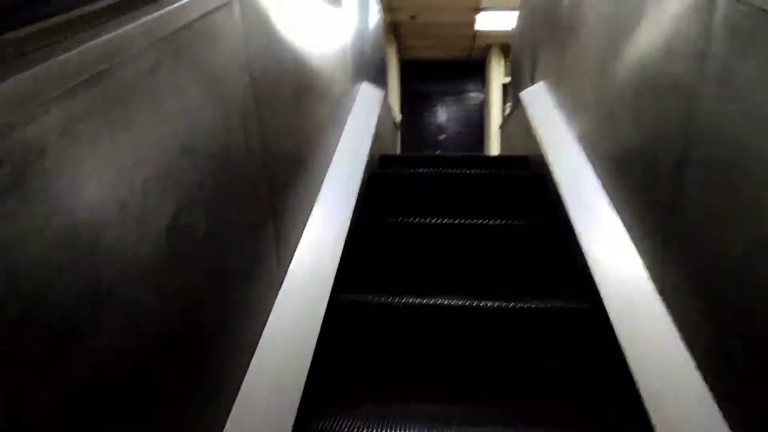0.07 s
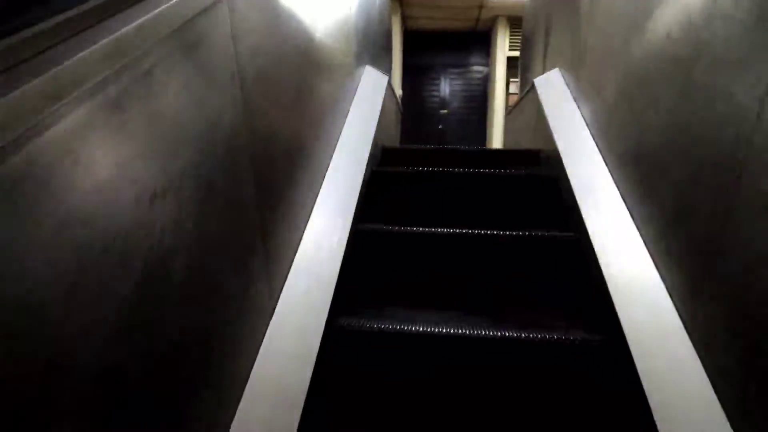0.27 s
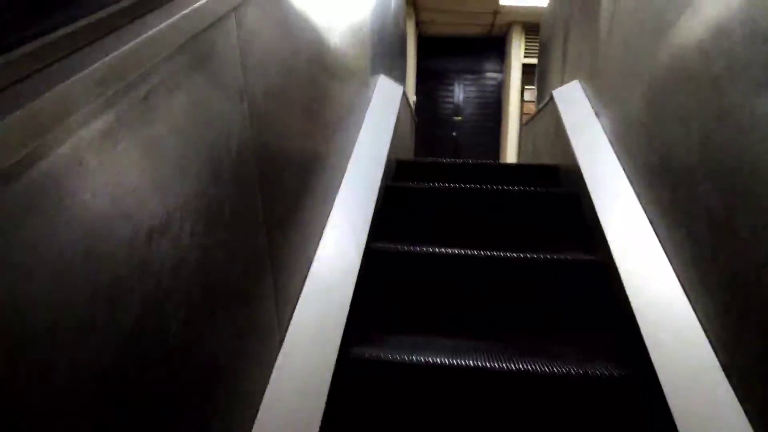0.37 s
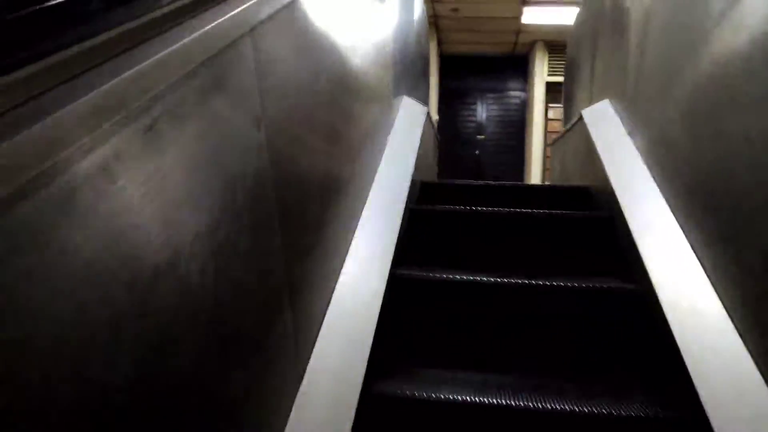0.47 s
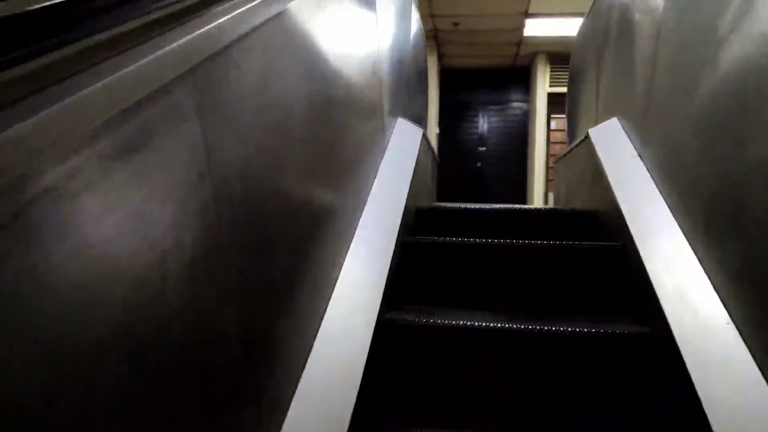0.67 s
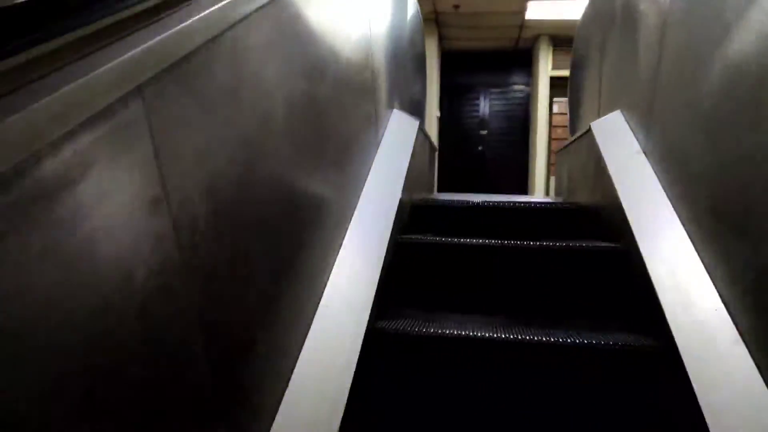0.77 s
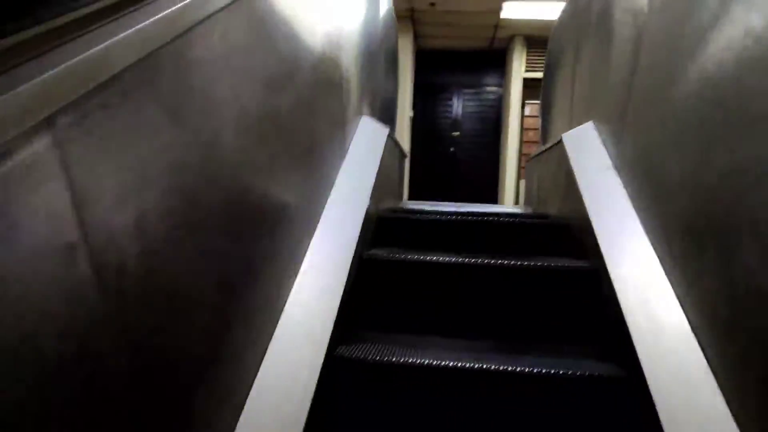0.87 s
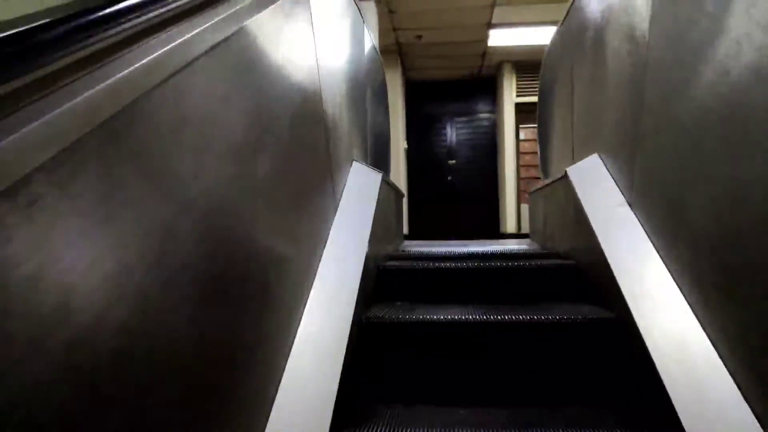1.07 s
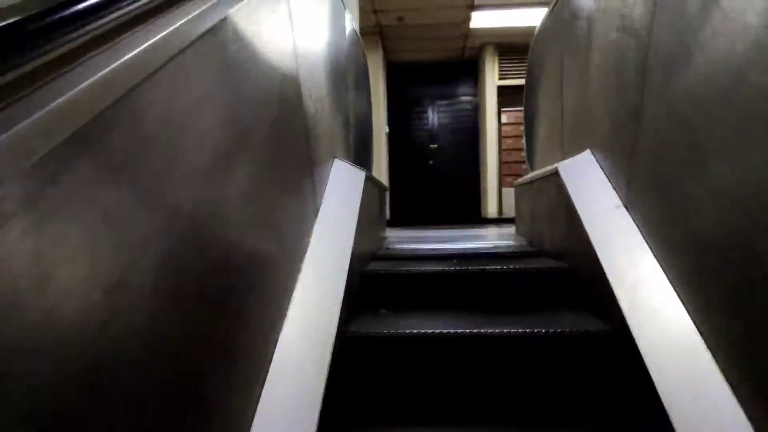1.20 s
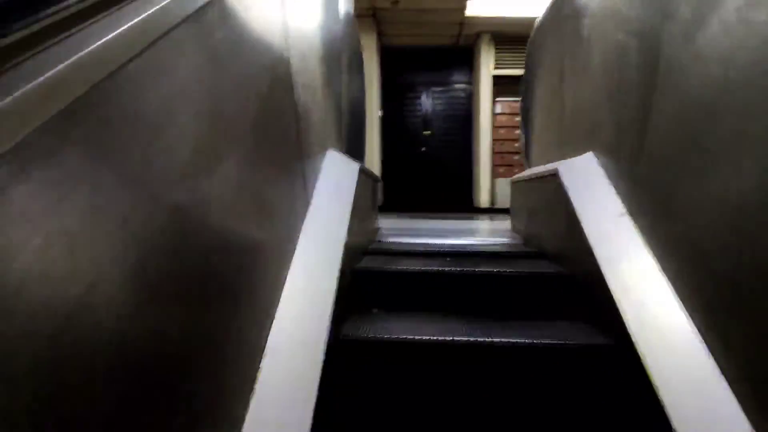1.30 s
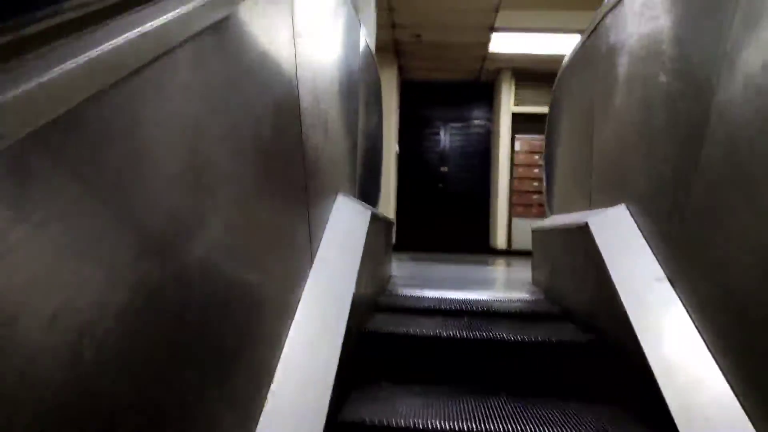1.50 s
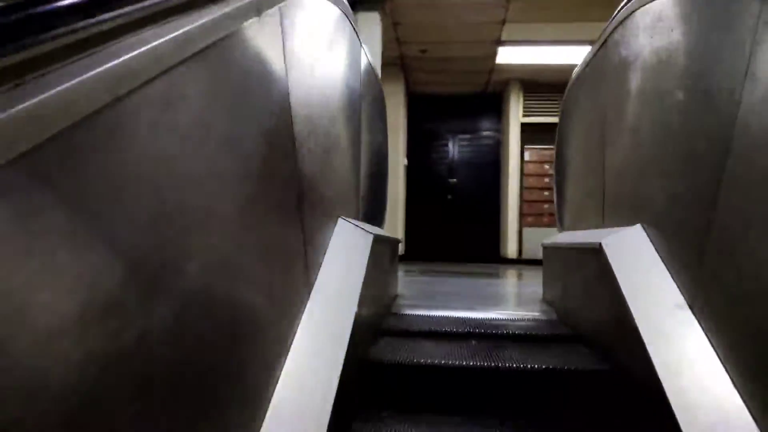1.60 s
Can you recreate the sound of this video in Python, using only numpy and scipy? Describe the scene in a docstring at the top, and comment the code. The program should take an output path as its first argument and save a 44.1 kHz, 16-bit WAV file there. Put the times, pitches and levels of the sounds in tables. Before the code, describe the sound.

Three heavy footsteps thud up metal escalator steps over a low building rumble.

```python
"""Three heavy steps up the metal stairs of an escalator, between steel side panels.
The hall rumbles and hisses throughout, with a faint machinery drone; clothes rustle from the start.
At 0.24 s a shoe clacks on the ribbed tread, thuds with the body's weight and scuffs; the stair rings.
The step at 0.74 s scuffs on along the ribs and the loaded stair groans; a brush and a squeak follow.
The last step lands at 1.24 s and its echoes fade into the hall."""
import sys
import numpy as np
from scipy import signal
from scipy.fft import rfft, irfft
from scipy.io import wavfile
from scipy.ndimage import uniform_filter1d

SR = 44100
rng = np.random.default_rng(int(sys.argv[2]) if len(sys.argv) > 2 else 0)


def unload_wav(signal):
    """Save mono or channel-first audio to the path in sys.argv[1] as 16-bit WAV at rate SR, clipped to [-1, 1]."""
    wavfile.write(
        sys.argv[1],
        SR,
        np.round(np.clip(np.atleast_2d(signal).T, -1, 1) * 32767).astype(np.int16),
    )


N = 72765
TIME_S = np.arange(N) / SR
BIN_HZ = np.fft.rfftfreq(N, 1 / SR)


def from_db(db):
    """Decibels to gain."""
    return 10 ** (np.asarray(db) / 20)


def pan(db):
    """Stereo gains for a left-minus-right level."""
    return from_db([[db / 2], [-db / 2]])


def at_hz(points, hz, column=1):
    """Table column, interpolated over log frequency."""
    table = np.array(points)
    return np.interp(np.log(np.maximum(hz, 1)), np.log(table[:, 0]), table[:, column])


def wander(per_s):
    """Random drift, spread about 1."""
    return np.interp(TIME_S * per_s, np.arange(N), rng.standard_normal(N))


def burst(start_s, rise_s, t60_s):
    """Linear rise, exponential release."""
    age_s = TIME_S - start_s
    return np.clip(age_s / rise_s, 0, 1) * from_db(-60 * np.maximum(age_s - rise_s, 0) / t60_s)


def swell(centre_s, half_width_s):
    """Gaussian envelope."""
    return np.exp(-((TIME_S - centre_s) / half_width_s) ** 2)


def convolve(x, response):
    """Convolution per channel, cut to N samples."""
    return signal.fftconvolve(np.atleast_2d(x), np.atleast_2d(response), axes=1)[:, :N]


def diffuse(colour):
    """Stereo noise from all sides, alike in the bass; rms 1."""
    # Diffuse field. Each row: frequency in Hz, left-right correlation.
    likeness = [(150, 0.71), (350, 0.98), (600, 0.62), (1080, 0.13), (1900, 0)]
    alike = at_hz(likeness, BIN_HZ)
    mid, side = rfft(rng.standard_normal((2, N)))
    spectrum = np.sqrt(1 + alike) * mid + np.sqrt(1 - alike) * side * [[1], [-1]]
    noise = irfft(from_db(at_hz(colour, BIN_HZ)) * spectrum, N)
    return noise / noise.std()


def hall():
    """Building rumble and hiss, plus wavering machinery tones."""
    # Noise spectrum. Each row: frequency in Hz, relative density in dB.
    colour = [(25, -34), (42, -20), (58, -3), (78, 2.5), (104, 4), (145, -0.5), (195, -4.5), (290, -3.5),
              (400, -3.5), (600, -8), (900, -11.5), (1400, -15), (2100, -18.5), (2800, -27.5), (4000, -40),
              (5500, -37), (7600, -30), (8700, -35.5), (9800, -48.5), (11500, -46)]
    # Machinery drone. Each row: frequency in Hz, level in dB.
    tones = [(101, -42.5), (198, -51), (242, -50.5), (389, -50.5)]
    waver_per_s, waver_db, waver_rad = 6.88, 3.5, 0.89
    drone = np.zeros(N)
    for hz, db in tones:
        gain = from_db(db + waver_db * wander(waver_per_s))
        drone += gain * np.sin(2 * np.pi * hz * TIME_S + waver_rad * wander(waver_per_s))
    return drone + from_db(-37.5) * diffuse(colour)


def clothes():
    """Cloth swishes as the legs swing."""
    # Swishes. Each row: peak time in seconds, level in dB, half-width in seconds.
    rustles = [(0.054, -52.5, 0.045), (.31, -55, 0.13), (.79, -52, 0.018), (.875, -51.5, 0.06),
               (.965, -56.5, 0.13), (1.33, -59.5, 0.13)]
    # Cloth spectrum. Each row: frequency in Hz, relative level in dB.
    colour = [(2500, -1.5), (4000, -5.5), (6000, -5.5), (7500, 6.5), (8500, 0.5), (9700, -22),
              (11500, -17.5)]
    return sum(from_db(db) * swell(peak_s, width_s) for peak_s, db, width_s in rustles) * diffuse(colour)


def sole_brush():
    """A sole brushes the metal between steps."""
    centre_hz = 4430
    colour = [(centre_hz / 2, -40), (centre_hz, 0), (centre_hz * 2, -40)]
    return from_db(-51) * swell(centre_s=0.897, half_width_s=0.0052) * diffuse(colour)


def sole_squeak():
    """One faint, rough chirp of a shoe on metal."""
    pitch_hz, rough_rad = 5830, 0.96
    tone = np.sin(2 * np.pi * pitch_hz * TIME_S + rough_rad * wander(per_s=500))
    return from_db(-50) * swell(centre_s=1.055, half_width_s=0.009) * tone


def grit():
    """Grit crunches under each landing sole."""
    # Crunches. Each row: start in seconds, level in dB, rise and T60 in seconds.
    crunches = [(0.231, -38, 0.01, .17), (0.735, -39, 0.011, 0.21), (1.234, -35, 0.011, 0.25)]
    # Crunch spectrum. Each row: frequency in Hz, relative level in dB.
    colour = [(1500, 4.5), (3000, 0), (4300, -6), (6000, -3.5), (7800, 2.5), (9000, -4.5), (10000, -18.5),
              (11500, -18.5)]
    envelope = sum(from_db(db) * burst(start_s, rise_s, t60_s) for start_s, db, rise_s, t60_s in crunches)
    return envelope * diffuse(colour)


def scuffs():
    """Soles slide over the ribs."""
    # Slides. Each row: start in seconds, level in dB, rise and T60 in seconds.
    slides = [(0.237, -29, 0.0051, 0.35), (0.737, -28.5, 0.0079, 0.16), (0.769, -28.5, 0.0044, 0.31),
              (0.804, -38, 0.0031, 0.29), (1.24, -29, 0.011, 0.4)]
    # Friction spectrum. Each row: frequency in Hz, relative level in dB.
    colour = [(200, -45), (600, -1), (1200, 0), (2100, -2.5), (2600, -13.5), (3200, -12), (4200, -34),
              (8000, -42), (11000, -64)]
    envelope = sum(from_db(db) * burst(start_s, rise_s, t60_s) for start_s, db, rise_s, t60_s in slides)
    return envelope * diffuse(colour)


def groan():
    """The middle stair hums under load, sagging in pitch."""
    start_s, sag_s, start_hz, end_hz = 0.775, 0.06, 299.8, 239.7
    hz = end_hz + (start_hz - end_hz) * np.exp(-np.maximum(TIME_S - start_s, 0) / sag_s)
    tone = np.sin(2 * np.pi * np.cumsum(hz) / SR)
    return from_db(-37.5) * burst(start_s, rise_s=0.074, t60_s=0.65) * tone


def reflections(x):
    """Quick, dense echoes between the steel panels, then the hall's tail."""
    # Echoes. Each row: frequency in Hz, panel level in dB, panel T60 in seconds, hall level in dB,
    # hall T60 in seconds. The levels set the balance; the panel level also sets the summed spectrum.
    space = [(148, -6, 0.12, -2, 0.86), (400, -1.5, 0.087, -8, 0.72), (1030, 0, 0.051, -7, 0.46),
             (1950, -0.5, 0.036, -13.5, 1), (6000, 8.5, 0.068, -1, 0.8)]
    panel_rise_s, hall_rise_s, smooth_hz = 0.0023, 0.019, 70.4
    edges_hz = np.geomspace(80, 10240, 8)
    response = np.zeros((2, N))
    for low_hz, high_hz in zip(edges_hz, edges_hz[1:]):
        bandpass = signal.butter(2, [low_hz, high_hz], "band", fs=SR, output="sos")
        band = signal.sosfilt(bandpass, diffuse([(1, 0), (SR, 0)]))
        band_share = 2 * (high_hz - low_hz) / SR
        centre_hz = np.sqrt(low_hz * high_hz)
        panel_db, panel_t60_s, hall_db, hall_t60_s = [at_hz(space, centre_hz, k) for k in range(1, 5)]
        for rise_s, db, t60_s in (panel_rise_s, panel_db, panel_t60_s), (hall_rise_s, hall_db, hall_t60_s):
            tail = band * burst(rise_s / 2, rise_s, t60_s)
            energy = np.sum(tail ** 2, axis=1, keepdims=True)
            response += from_db(db) * tail * np.sqrt(band_share / energy)
    # Flatten chance peaks so the echoes add no pitch.
    spectrum = rfft(response)
    power = uniform_filter1d(np.mean(abs(spectrum) ** 2, axis=0), size=int(smooth_hz * N / SR))
    even = spectrum * from_db(at_hz(space, BIN_HZ)) / np.sqrt(power + 1e-3)
    return convolve(x.mean(axis=0), irfft(even, N)[:, :N // 2])


def stair_ring(force):
    """The hollow stair rings in decaying modes."""
    # Modes. Each row: frequency in Hz, gain in dB, T60 in seconds.
    modes = [(111.5, -11.5, 0.67), (189.5, -16, 0.43), (317.3, -8, 0.16), (385.2, -22.5, 0.33),
             (539, -22, 0.15), (590, -21, 0.072), (705, -21.5, 0.27), (894, -2.5, 0.23), (1104, -10, 0.19),
             (1370, -40, 0.17), (1490, -29, 0.31), (1830, -31, 0.35), (2120, -8, 0.18), (2613, -13, 0.25),
             (3094, -17, 0.27)]
    response = sum(from_db(db - 60 * TIME_S / t60_s) * np.cos(2 * np.pi * hz * TIME_S)
                   for hz, db, t60_s in modes)
    return convolve(force, response)


def footfalls():
    """Each contact is a heavily damped knock that echoes and drives the stair."""
    # Shoe on tread. Each row: start in seconds, envelope peak in dB before the low cut, pitch in Hz,
    # rise in ms, stair drive in dB relative to the knock, left-minus-right pan in dB.
    contacts = [(0.236, -17, 1930, .55, -7, -14), (0.2365, -4, 562, 0.54, -13.5, -3),
                (0.2404, -24.5, 365, 8.6, -16, -3), (0.2434, -20, 1243, 1.4, 6, -5),
                (.2485, -23.5, 493, 1.5, -10, 0), (0.290, -28, 366, 2, -22, -3),
                (0.7420, -37, 2030, 1.4, -27, -12), (0.7424, -19, 1154, 1.84, 2.5, -3.5),
                (0.7446, -15, 291, 1.26, -14, 0), (0.7483, -33, 1137, 2.3, -10, 5),
                (0.7716, -26, 1810, 0.55, -18, -5), (0.7749, -31.5, 2950, 0.5, 0, 7),
                (0.7842, -30, 1440, 0.25, -12, 3), (0.7862, -30.5, 447, 1.2, -7, -3),
                (.8045, -23.5, 640, 2.3, -4, -2), (0.805, -28.5, 1070, 2.1, -19, -7),
                (1.2390, -22.5, 2071, 1.3, -2.5, -4.5), (1.2393, -15, 1180, 0.33, -16, 3),
                (1.245, -14.5, 560, 1.37, 1.5, -8), (1.2450, -10, 328, 1.23, -5, -1.5),
                (1.2455, -23, 913, 2.9, -0.5, -13), (1.2724, -20.5, 415, 0.98, 8.5, -12),
                (1.340, -23.5, 332, 1.6, -12, 3)]
    low_cut_hz, echo_pan_db = 222, -1  # right panel is nearer
    knocks, force = np.zeros((2, N)), np.zeros(N)
    for start_s, db, hz, rise_ms, drive_db, pan_db in contacts:
        age_s = np.maximum(TIME_S - start_s, 0)
        rise = age_s / (rise_ms / 1000)
        envelope = rise * np.exp(1 - rise)
        knock = from_db(db) * envelope * np.sin(2 * np.pi * hz * age_s)
        knocks += knock * pan(pan_db)
        force += from_db(drive_db) * knock * 2 / envelope.sum()
    knocks = signal.sosfilt(signal.butter(2, low_cut_hz, "high", fs=SR, output="sos"), knocks)
    return knocks + pan(echo_pan_db) * reflections(knocks) + stair_ring(force)


def scene():
    """Steps, shoe and cloth noises over the hall; stereo."""
    return footfalls() + groan() + scuffs() + grit() + sole_brush() + sole_squeak() + clothes() + hall()


def record(dry):
    """Bass cut on the right microphone, low-pass on both."""
    low_cut_hz, floor_db, high_cut_hz = 169, -43, 11600
    slope = (BIN_HZ / low_cut_hz) ** 7
    right_gain = np.maximum(slope / np.hypot(1, slope), from_db(floor_db))
    right = irfft(rfft(dry[1]) * right_gain, N)
    lowpass = signal.ellip(10, 0.2, 70, high_cut_hz, fs=SR, output="sos")
    return signal.sosfilt(lowpass, [dry[0], right])


dry = scene()
out = record(dry)
unload_wav(out)
```